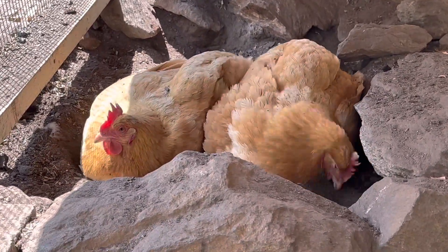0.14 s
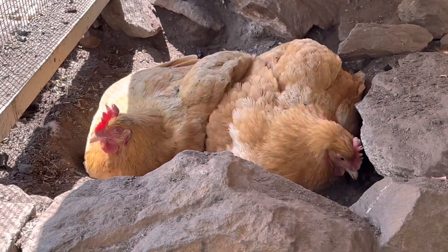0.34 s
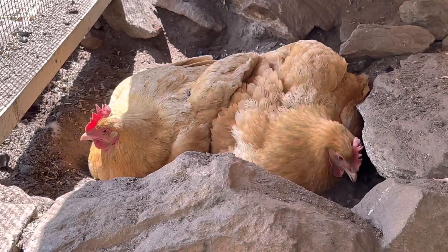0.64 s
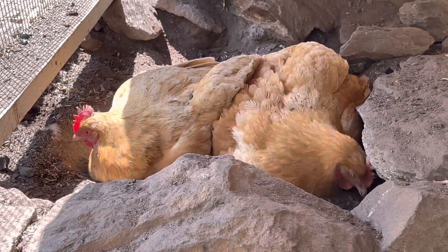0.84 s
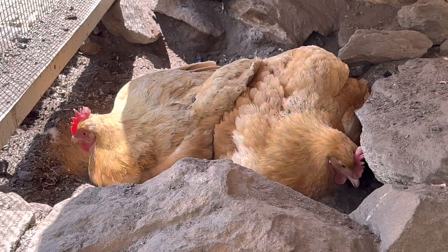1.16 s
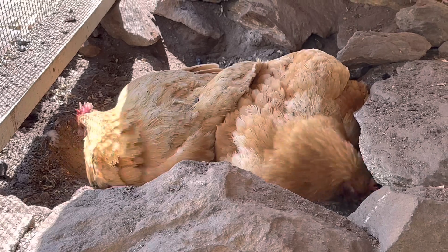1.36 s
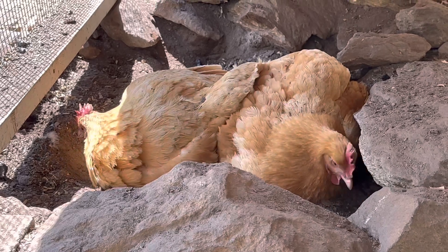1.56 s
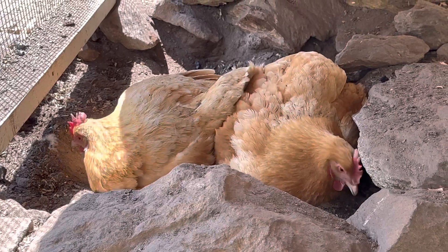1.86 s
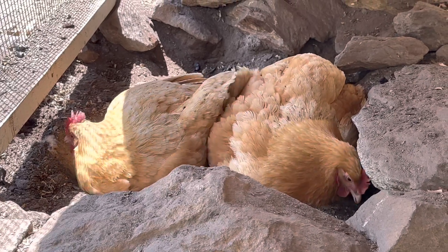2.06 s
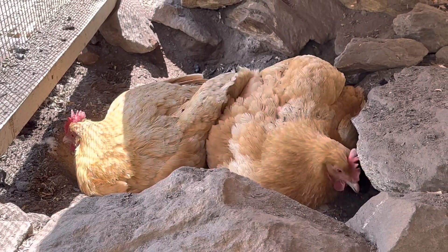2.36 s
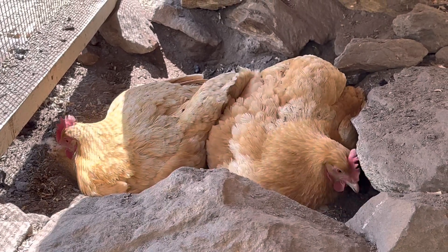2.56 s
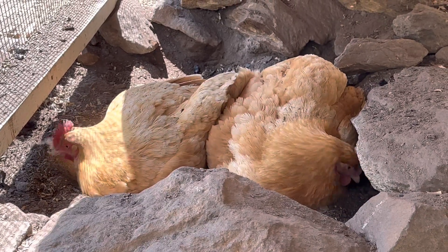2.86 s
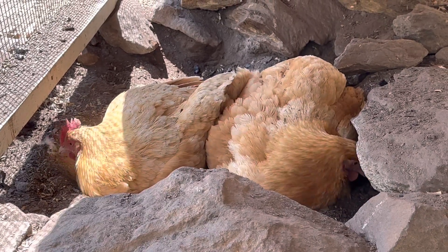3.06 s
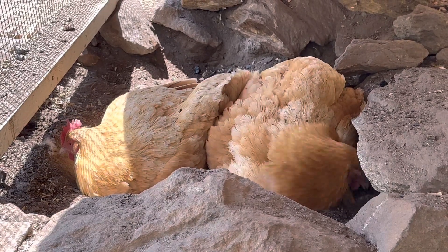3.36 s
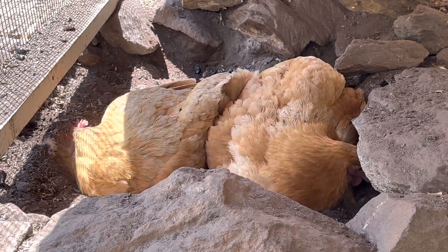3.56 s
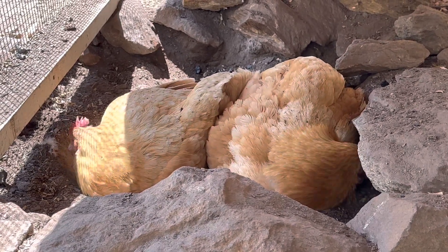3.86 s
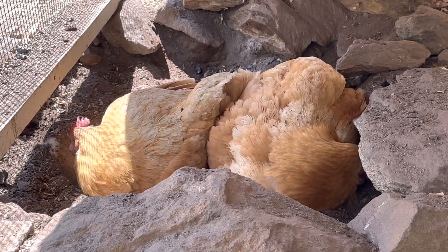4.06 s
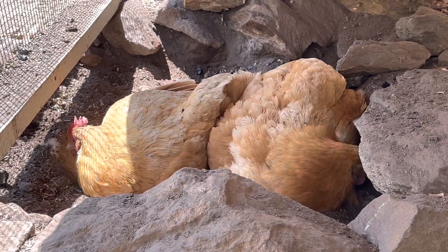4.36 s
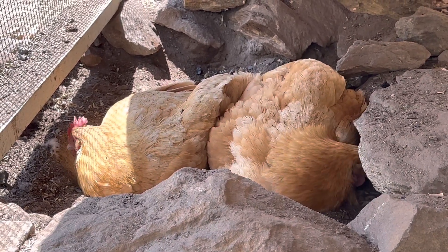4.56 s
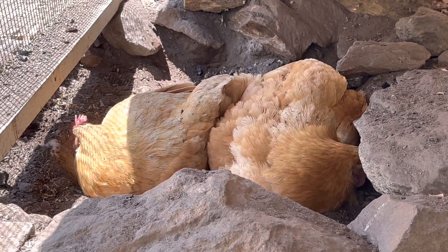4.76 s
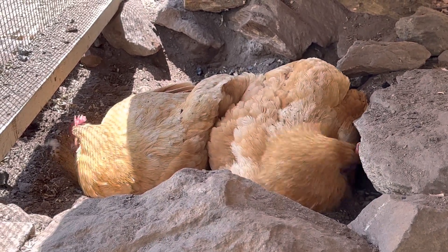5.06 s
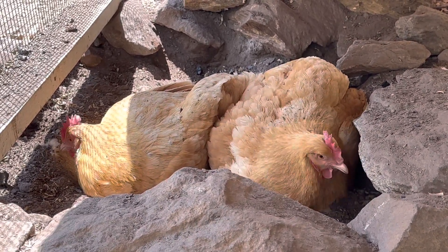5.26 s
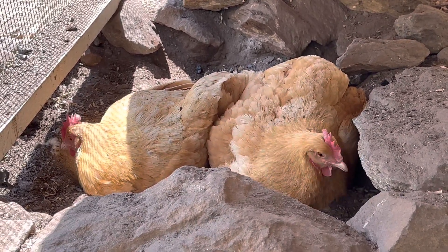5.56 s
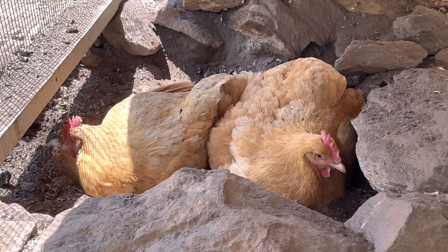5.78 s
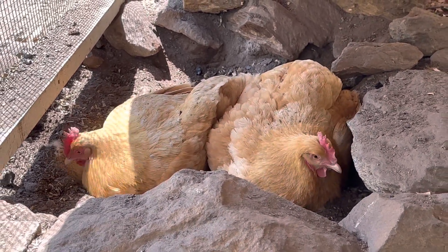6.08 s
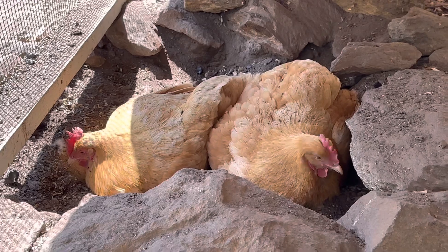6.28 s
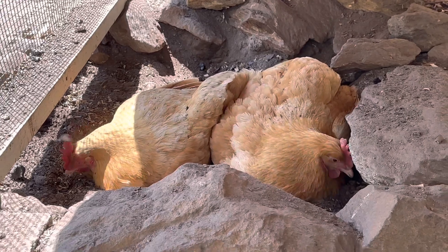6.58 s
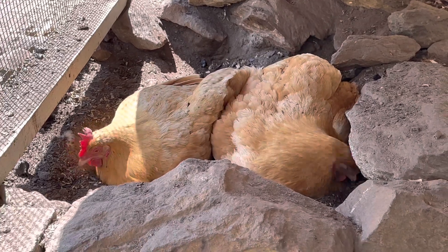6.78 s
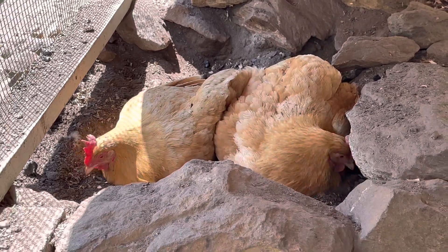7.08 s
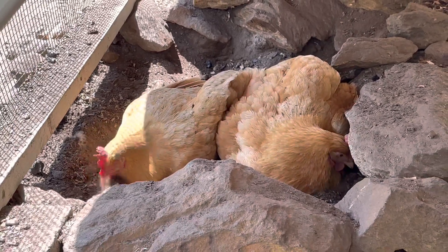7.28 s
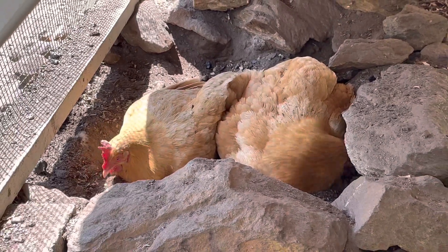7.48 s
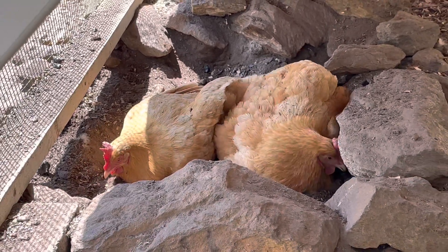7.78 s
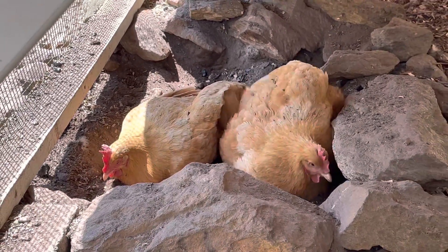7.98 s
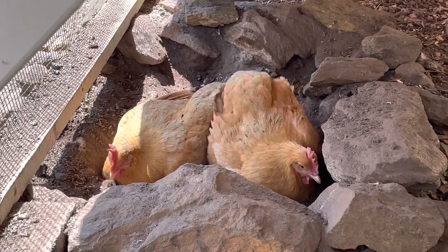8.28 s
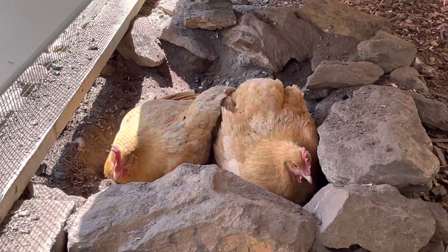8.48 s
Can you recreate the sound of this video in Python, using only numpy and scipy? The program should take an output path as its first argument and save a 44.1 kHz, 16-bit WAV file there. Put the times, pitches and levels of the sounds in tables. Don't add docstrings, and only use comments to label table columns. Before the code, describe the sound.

Hens scrape feathers and peck in dry soil among rocks while sparrows cheep nearby and a distant truck drones over a low town rumble.

```python
import sys
import numpy as np
from scipy import signal
from scipy.fft import rfft, irfft, next_fast_len
from scipy.io import wavfile
from scipy.ndimage import uniform_filter1d

SR = 44100
rng = np.random.default_rng(int(sys.argv[2]) if len(sys.argv) > 2 else 0)


def convert_level_to_amplitude(level_db):
    exponent = np.asarray(level_db, float) / 20
    return 10 ** exponent


def transcribe(signal):
    frames = np.atleast_2d(signal).T
    limited = np.clip(frames, -1, 1)
    pcm = np.round(limited * 32767).astype(np.int16)
    wavfile.write(sys.argv[1], SR, pcm)


N = 380583


def evened(x):
    return x / np.sqrt(np.mean(x ** 2) + 1e-20)


def read(points, hz):
    f, value = np.transpose(points)
    return np.interp(np.log(hz + 1), np.log(f + 1), value)


def add(mix, s, sound):
    part = mix[round(s * SR):][:len(sound)]
    part += sound[:len(part)]


def unfold(rows):
    s, *columns = np.transpose(rows)
    t = np.arange(s[0], s[-1], 1 / SR)
    return s[0], [np.interp(t, s, c) for c in columns]


def wander(count, smooth_s):
    size = int(smooth_s * SR) + 1
    noise = rng.standard_normal(count + 4 * size)
    drift = uniform_filter1d(uniform_filter1d(noise, size), size)
    return evened(drift)[:count]


def colour(x, points):
    hz = np.linspace(0, SR / 2, 513)
    taps = signal.firwin2(511, hz, convert_level_to_amplitude(read(points, hz)), fs=SR)
    return signal.oaconvolve(x, taps, "same")


def band(x, lo_hz, hi_hz):
    sos = signal.butter(2, [lo_hz, min(hi_hz, .45 * SR)], "bandpass", fs=SR, output="sos")
    return signal.sosfilt(sos, x)


def grains(per_s, spread_db):
    landed = rng.random(N) < per_s / SR
    size = convert_level_to_amplitude(spread_db * np.minimum(rng.exponential(1, N), 6)) * landed
    kind, noise = rng.integers(0, 6, N), rng.standard_normal(N)
    puffs = [signal.lfilter([1], [1, -.992], size * (kind == k)) * noise for k in range(6)]
    centres_hz = np.geomspace(1500, 14000, 6)
    tinted = sum(evened(band(p, hz, 1.6 * hz)) for p, hz in zip(puffs, centres_hz))
    return evened(evened(sum(puffs)) + 0.66 * evened(tinted))


# (frequency [Hz], level [dB])
FEATHER_COLOUR = [(300, 7), (1000, 2), (2500, 2.5), (4000, -2), (7000, -4), (8500, -3.5), (10500, -12.5),
                  (12000, -31)]
# (frequency [Hz], level [dB])
SAND_COLOUR = [(9500, -28), (11000, -5.5), (14000, 0.5), (15500, 1.5)]
# (time [s], length [s], level [dB], sand hiss relative to it [dB])
FEATHER_STROKES = [(0.053, 0.2, -83, -8), (0.764, .24, -91.5, -8), (1.334, .04, -78.5, -11),
                   (2.149, 0.03, -82, -9.5), (2.185, .03, -79.5, -10.5), (2.525, .42, -94.5, 8.5),
                   (2.53, .025, -96, 10), (2.64, .075, -87.5, 10), (2.757, .015, -93.5, 11),
                   (2.798, .035, -90.5, 9), (2.883, 0.037, -97, 8), (2.972, 0.23, -95.5, 7.5),
                   (3.472, .025, -95.5, 7.5), (3.602, 0.039, -94, 8), (3.702, 0.1, -93, 7.5),
                   (3.855, .09, -93.5, 7.5), (4.17, 0.098, -92, 5.5), (7.491, 0.013, -81, -5),
                   (8.073, .02, -86, -8), (3.277, .05, -81, -18), (3.449, 0.487, -88, -8),
                   (4.178, 0.02, -89.5, 3.5), (4.243, 0.015, -74, -9), (4.3, 0.014, -97, 2),
                   (7.618, 0.037, -87.5, -7), (5.532, 0.052, -77.5, -5), (5.747, 0.24, -85, -3.5),
                   (6.022, 0.027, -76, 1.5), (6.2, 0.82, -103, 0), (7.185, 0.04, -84, 2.5),
                   (7.47, 0.041, -82.5, 1.5), (7.81, 0.078, -79.5, -6.5), (8.28, .04, -65.5, -17.5),
                   (8.35, 0.033, -74, -7), (8.41, .035, -70.5, 0), (8.464, .04, -83, -18)]


def rustle():
    press_s, lift_s = 0.015, 0.036
    stir_db, stir_sand_db = -92.5, -2
    clump_db, clump_s = 3, 0.014
    t = np.arange(N) / SR
    drag = convert_level_to_amplitude(stir_db) * np.ones(N)
    hiss = convert_level_to_amplitude(stir_db + stir_sand_db) * np.ones(N)
    for s, length_s, db, sand_db in FEATHER_STROKES:
        corners_s = [s - press_s, s, s + length_s, s + length_s + lift_s]
        stroke = convert_level_to_amplitude(db) * np.interp(t, corners_s, [0, 1, 1, 0]) ** 2
        drag += stroke
        hiss += convert_level_to_amplitude(sand_db) * stroke
    drag *= convert_level_to_amplitude(clump_db * wander(N, clump_s))
    hiss *= convert_level_to_amplitude(clump_db * wander(N, clump_s))
    scrape = grains(1800., 2.0)
    feathers = convert_level_to_amplitude(2.5) * drag * evened(colour(scrape, FEATHER_COLOUR))
    sand = 0.46 * scrape + grains(900., 2.2)
    return feathers + convert_level_to_amplitude(1.5) * hiss * evened(colour(sand, SAND_COLOUR))


def peck(peak_db, thud_db, sand_db):
    t = np.arange(4000) / SR
    tail = .5 * convert_level_to_amplitude(-60 * t / 0.059 + 3.6 * wander(len(t), 0.0025))
    burst = rng.standard_normal(len(t)) * (convert_level_to_amplitude(-60 * t / 0.0017) + tail)
    thud = convert_level_to_amplitude(thud_db - 0.5) * evened(band(burst * np.minimum(t / 0.0091, 1), 200, 2650))
    tick = evened(colour(burst, FEATHER_COLOUR[2:]))
    sand = convert_level_to_amplitude(sand_db + 9.0) * evened(colour(burst, SAND_COLOUR))
    return convert_level_to_amplitude(peak_db - 22) * (thud + tick + sand)


def speck(peak_db, sand_db):
    t = np.arange(1500) / SR
    burst = rng.standard_normal(len(t)) * (convert_level_to_amplitude(-60 * t / 0.004) + convert_level_to_amplitude(-6.0 - 60 * t / 0.03))
    tick = evened(colour(burst, FEATHER_COLOUR[2:]))
    sand = convert_level_to_amplitude(sand_db + 2.0) * evened(colour(burst, SAND_COLOUR))
    return convert_level_to_amplitude(peak_db - 20.5) * (tick + sand)


def scuff(db, length_s, hz):
    count = int(length_s * SR)
    grit = rng.standard_normal(count) * convert_level_to_amplitude(1.0 * wander(count, 0.00077))
    return convert_level_to_amplitude(db) * evened(band(grit, 0.38 * hz, 1.1 * hz)) * signal.windows.tukey(count, .6)


# (time [s], peak level [dB], thud relative to it [dB], sand relative to it [dB])
PECKS = [(0.0696, -61, 10, -23), (0.1366, -67, 9, -1.5), (0.222, -55.5, -11, -7), (0.254, -58.5, -16, -12),
         (0.287, -55, -20, -26), (1.096, -66.5, -5, -5.5), (1.3649, -43.5, 0.5, -26.5),
         (2.6988, -58.5, -20, -6.5), (2.825, -60.5, -15, -12), (2.997, -56, -12, -7),
         (3.2014, -60, 3, -4.5), (3.2789, -51, -10, -19), (3.3107, -39.5, -3, -19), (3.711, -59.5, -1, -15),
         (3.8506, -49, -9, -12), (4.1727, -63, -9, -6), (4.293, -53, -0.5, -16), (5.1804, -59.5, 12, -18),
         (5.527, -68.5, -2, 1.5), (5.7723, -64, -9, -41), (6.0265, -50.5, -13, -13), (6.48, -60.5, -9, -13),
         (7.464, -65, 12, -9.5), (7.766, -55.5, -20, -22), (7.916, -58, -4, -18), (8.128, -56.5, -18, -12),
         (8.284, -51.5, -30, -27), (8.3745, -55.5, -13, -17)]
# (time [s], peak level [dB], sand relative to it [dB])
GRIT_SPECKS = [(0.169, -61.5, -16), (.41, -66, -2), (.595, -63.5, -15), (2.5414, -74, 11),
               (2.6566, -67.5, 4.5), (2.8816, -63, 14.5), (2.5925, -75.5, 8), (2.6329, -74, 8.5),
               (3.0614, -79, 8), (3.0939, -78, 7), (3.1423, -77, 9), (3.6257, -74, 7), (3.7673, -74, 8),
               (3.918, -77.5, 7.5), (7.255, -70, -9), (7.5, -62, -9), (3.421, -63, -17), (4.2294, -70, -2),
               (4.2462, -66.5, -12), (4.5873, -63, -16), (5.435, -71, 11), (5.7379, -64, -17),
               (5.9329, -62.5, -7), (6.6884, -67, -18), (7.1955, -63, -9), (7.2937, -72, 19),
               (8.4043, -58.5, 0), (8.4746, -58, -16), (8.578, -63, -4)]
# (time [s], level [dB], length [s], centre frequency [Hz])
SCUFFS = [
    (0.464, -79, 0.07, 4600),
    (0.859, -72.5, 0.14, 3230),
    (2.141, -64, 0.053, 2200),
    (6.455, -80, 0.094, 4390),
    (6.683, -62, 0.04, 1220),
    (6.843, -75.5, 0.063, 3800),
    (7.163, -66, 0.096, 2900),
    (8.277, -62, 0.064, 1505),
]


def foraging():
    hens = rustle()
    for s, *row in PECKS:
        add(hens, s + .001, peck(*row))
    for s, *row in GRIT_SPECKS:
        add(hens, s, speck(*row))
    for s, *row in SCUFFS:
        add(hens, s, scuff(*row))
    return hens


# (time [s], effort level [dB], pitch [Hz])
CLUCK = [
    (1.728, -49, 280),
    (1.738, -35, 286),
    (1.758, -34, 290),
    (1.767, -40, 280),
    (1.779, -56, 270),
]
# (multiple of the pitch, level [dB])
CLUCK_TONES = [(.95, 0), (1.45, -17), (2.05, -11), (2.4, -15), (3, -5), (3.4, -13), (4, -21), (4.5, -21)]
# (low edge [Hz], high edge [Hz], level [dB])
THROAT_BREATH = [(480, 1100, -14), (1050, 2300, -29), (4500, 9000, -54)]
# (low edge [Hz], high edge [Hz], ring [Hz], level [dB], start time [s])
CREAK = (2900, 4300, 3950, -39, 1.738)


def cluck():
    s, (effort_db, hz) = unfold(CLUCK)
    count = len(hz)
    turn = 2 * np.pi * np.cumsum(hz * (1 + .025 * wander(count, .003))) / SR
    tones = sum(convert_level_to_amplitude(db + 2.0 * wander(count, .003)) * np.sin(k * turn) for k, db in CLUCK_TONES)
    puffs = rng.standard_normal(count) * (1 + np.cos(turn))
    voice = evened(tones)
    for lo, hi, db in THROAT_BREATH:
        voice += convert_level_to_amplitude(db) * evened(band(band(puffs, lo, hi), lo, hi))
    lo_hz, hi_hz, ring_hz, creak_db, start_s = CREAK
    t = s + np.arange(count) / SR
    strong = (1 + np.cos(.44 * turn - .9)) ** 2 * np.clip((t - start_s) / .012, 0, 1)
    creak = evened(band(puffs, lo_hz, hi_hz)) + 2 * np.sin(2 * np.pi * ring_hz * t)
    voice = evened(voice) + convert_level_to_amplitude(creak_db) * evened(strong * creak)
    call = convert_level_to_amplitude(effort_db) * voice * signal.windows.tukey(count, .15)
    call = np.pad(call, (0, SR // 10))
    slap_s, slap_db, slap_hz = .041, -19, 600
    return s, call + convert_level_to_amplitude(slap_db) * band(np.roll(call, int(slap_s * SR)), 150, slap_hz)


def ring(modes):
    t = np.arange(6000) / SR
    tones = sum(convert_level_to_amplitude(db - 60 * t / t60) * np.sin(2 * np.pi * hz * t) for hz, db, t60 in modes)
    return tones * np.minimum(t / 0.0013, 1)


# (frequency [Hz], level [dB], time to fall 60 dB [s])
WIRE_TONES = [(700, -5, .06), (1500, -12, .05), (1916, -2, .12), (1870, -15, .08), (2330, -14, .06),
              (6519, -22, .15)]
# (time [s], level [dB])
WIRE_TAPS = [
    (8.284, -43.5),
    (8.341, -50.5),
]
# (time [s], level [dB], frequency [Hz])
PEBBLE_KNOCKS = [
    (1.368, -43, 270),
    (3.312, -45, 200),
    (2.146, -55, 720),
    (2.148, -60, 1650),
]
# (time [s], level [dB], frequency [Hz])
STONE_PINGS = [
    (8.3726, -62, 5840),
    (8.4045, -61, 8200),
    (8.414, -55, 8400),
    (8.4749, -63, 4580),
    (8.477, -65, 6900),
    (8.5766, -72, 6700),
    (8.44, -62, 1620),
    (1.398, -70, 5550),
    (6.69, -70, 3900),
    (8.077, -72, 4600),
]


def taps():
    struck = np.zeros(N)
    for s, db in WIRE_TAPS:
        add(struck, s, convert_level_to_amplitude(db) * ring(WIRE_TONES))
    for s, db, hz in PEBBLE_KNOCKS:
        add(struck, s, convert_level_to_amplitude(db) * ring([(hz, 0, .05), (2.2 * hz, -3, .04)]))
    for s, db, hz in STONE_PINGS:
        add(struck, s, convert_level_to_amplitude(db) * ring([(hz, -2, .022), (1.04 * hz, -7, .015)]))
    return struck


# (time [s], strength of scattered strands, roughness factor)
HEDGE = [
    (5.1, .22, 1.0),
    (5.6, .48, 1.5),
    (8.2, .48, 1.5),
    (8.24, .15, .6),
]


def cheep(s, length_s, top_hz, end_hz, db, shape):
    crest, bend, rise, loudest = shape
    at, strengths, factors = np.transpose(HEDGE)
    scatter, rough = np.interp(s, at, strengths), np.interp(s, at, factors)
    u = np.linspace(0, 1, int(length_s * SR))
    from_crest = abs(u - crest) / (1 - crest) * np.where(u < crest, rise, 1)
    hz = top_hz - (top_hz - end_hz) * from_crest ** bend
    level_db = db + np.interp(u, [0, loudest, 1], [-6, 0, -1.5])
    turn = 2 * np.pi * np.cumsum(hz * (1 + .014 * rough * wander(len(hz), .003))) / SR
    burr = convert_level_to_amplitude(3.5 * rough ** .5 * wander(len(hz), .005))
    whistle = np.sin(turn) + convert_level_to_amplitude(-29) * np.sin(2 * turn)
    tone = whistle * convert_level_to_amplitude(level_db) * evened(burr) * signal.windows.tukey(len(hz), .2)
    strands = np.zeros(SR // 45)
    strands[rng.integers(SR // 300, SR // 45, 6)] = scatter * rng.uniform(-1, 1, 6)
    strands[0] = 1
    return s - .003, signal.fftconvolve(tone, strands / np.linalg.norm(strands))


# (time [s], length [s], top pitch [Hz], end pitch [Hz], level [dB])
ARCHES = [
    (0.019, 0.08, 3105, 2690, -59.5),
    (0.257, 0.091, 3290, 2690, -59),
    (2.021, 0.083, 2760, 2100, -59),
    (3.71, 0.082, 3440, 2240, -63),
    (4.608, .05, 4200, 3220, -60),
    (5.762, 0.048, 3600, 3300, -71),
    (6.49, 0.05, 3330, 2900, -75),
]
HOLDS = [
    (.612, .064, 2480, 1830, -56),
    (3.498, .06, 3080, 2620, -59),
    (4.625, .072, 2855, 2120, -63),
    (4.943, .075, 2760, 2280, -62),
    (7.525, .075, 3260, 2850, -66),
    (6.09, .075, 3305, 2650, -64),
    (6.7, .042, 4020, 3550, -68),
]
DIVES = [
    (5.785, .053, 2970, 2240, -63),
    (6.288, .025, 4200, 3100, -75),
    (6.635, .025, 2600, 2440, -67),
    (8.291, .04, 3150, 2740, -59),
    (7.19, .04, 2180, 1880, -65),
]
SLIDES = [(.772, .088, 2900, 1990, -59), (2.19, .075, 3120, 2120, -59.5), (2.36, .085, 3130, 2150, -59.5),
          (3.138, .04, 4120, 3300, -69), (4.768, .08, 3170, 2050, -62.5), (5.632, .06, 2810, 2520, -69),
          (5.928, .062, 3260, 2720, -61), (6.985, .05, 3500, 2700, -71), (.855, .035, 3900, 2850, -74),
          (7.18, .034, 3650, 3330, -70), (8.124, .045, 3550, 3330, -72), (6.607, .055, 3360, 2200, -64.5),
          (7.918, .032, 3440, 3390, -68), (7.348, .05, 3120, 2450, -64), (4.77, .04, 3480, 3200, -72)]
SCRAPS = [(1.285, .026, 3520, 2780, -71), (1.4, .05, 3430, 3330, -75), (1.416, .022, 3250, 2780, -71),
          (1.47, .02, 2170, 2090, -72), (1.575, .028, 3620, 2880, -72), (1.774, .036, 2830, 2720, -67),
          (6.668, .026, 2560, 2480, -68), (6.724, .04, 3520, 2780, -66), (6.75, .032, 3520, 3080, -70),
          (7.378, .035, 2560, 2400, -66), (7.968, .018, 4320, 4080, -78), (7.986, .04, 3800, 2750, -72),
          (8.003, .026, 2920, 2680, -70), (8.106, .018, 2880, 3060, -72), (8.138, .075, 3080, 2180, -66),
          (8.332, .036, 2720, 2500, -64), (8.25, .03, 3440, 3370, -69), (8.31, .03, 3000, 3080, -70),
          (3.555, .03, 2600, 2060, -70), (3.555, .03, 2780, 2740, -70), (4.958, .022, 3750, 2900, -75),
          (5.5, .024, 4020, 3880, -73), (5.515, .02, 3600, 3050, -77), (5.664, .03, 3620, 3300, -71),
          (5.667, .02, 4250, 3800, -77), (5.824, .022, 4250, 4150, -75), (6.292, .02, 3250, 3150, -71),
          (6.296, .02, 3800, 3450, -73), (3.815, .03, 2800, 2700, -74), (.065, .05, 2080, 1900, -70),
          (3.165, .025, 3500, 2600, -73), (7.945, .045, 3320, 2780, -74), (8.15, .035, 3050, 2900, -70)]
# (time [s], top pitch [Hz], end pitch [Hz], level [dB])
CHIPS = [
    (1.612, 2780, 2580, -71),
    (3.025, 4000, 2700, -76),
    (7.995, 2530, 2330, -67),
    (6.522, 3000, 2150, -71),
    (8.455, 3500, 2480, -76),
    (3.725, 3720, 3600, -75),
    (6.9, 3460, 2500, -75),
    (7.06, 3600, 3110, -75),
    (7.785, 3450, 2950, -74),
    (6.985, 4100, 3850, -79),
]
ARCH_SHAPE = (0.33, 1.7, 2.5, 0.87)
HOLD_SHAPE = (.2, 2.0, 1.2, 0.48)
DIVE_SHAPE = (.04, .62, .5, .55)
SLIDE_SHAPE = (.08, 0.95, 2.3, 0.46)


def sparrows():
    birds = np.zeros(N)
    kinds = [(ARCHES, ARCH_SHAPE), (HOLDS, HOLD_SHAPE), (DIVES, DIVE_SHAPE),
             (SLIDES, SLIDE_SHAPE), (SCRAPS, SLIDE_SHAPE)]
    for rows, shape in kinds:
        for row in rows:
            add(birds, *cheep(*row, shape))
    for s, *row in CHIPS:
        add(birds, *cheep(s, 0.048, *row, SLIDE_SHAPE))
    return birds


def yard(x, t60_s):
    t = np.arange(SR // 3) / SR
    tail = rng.standard_normal((2, len(t))) * convert_level_to_amplitude(-60 * t / t60_s) * (t > .006)
    return signal.fftconvolve(x[None], tail / np.linalg.norm(tail[0]), axes=1)[:, :N]


def truck(rows):
    s, (hz, level_db) = unfold(rows)
    count = len(hz)
    octave_db = level_db - 16 - 0.4484 * abs(2 * hz - 155.2)
    shift_s, strain_s, strain_db = 5.12, 1.32, 10.5
    since_s = s + np.arange(count) / SR - shift_s
    octave_db += strain_db * np.clip(1 - since_s / strain_s, 0, 1) * (since_s > -.1)
    uneven_db, uneven_s = 3.5, 0.11
    above_db = -66.5 + uneven_db * wander(count, uneven_s)
    below_db = -62.5 + uneven_db * wander(count, uneven_s)
    turn = 2 * np.pi * np.cumsum(hz) / SR
    tone = convert_level_to_amplitude(level_db + 0.45 * wander(count, 0.024)) * np.sin(turn)
    tone += convert_level_to_amplitude(octave_db) * (np.sin(2 * turn) + convert_level_to_amplitude(-13.5) * np.sin(3 * turn))
    tone += convert_level_to_amplitude(above_db) * np.sin(1.2 * turn)
    tone += convert_level_to_amplitude(below_db + 2.3 * wander(count, 0.057)) * np.sin(.78 * turn)
    return s, np.sqrt(2) * tone * signal.windows.tukey(count, .03)


def idler():
    t = np.arange(N) / SR
    swell = convert_level_to_amplitude(-51.5 + 2.1 * wander(N, 0.058)) * np.exp(-((t - 1.85) / 0.39) ** 2)
    return swell * np.sin(2 * np.pi * 105.2 * t)


# (time [s], firing rate [Hz], level [dB])
TRUCK_GEARS = [
    [(0.0, 85, -56), (1.2, 86.5, -53.5), (2.4, 87.07, -47.5), (3.1, 88.53, -47.5), (3.6, 90.4, -41.5),
     (4, 92.7, -44.5), (4.3, 92.4, -44.5), (4.47, 91.4, -54.5)],
    [(5.12, 77.8, -63), (5.3, 78.26, -48), (5.6, 77, -45), (5.95, 78.46, -43), (6.3, 78.73, -45),
     (7.1, 81.7, -50), (8, 83.05, -52), (8.62, 85.6, -48.5)],
]


def engines():
    far = idler()
    for rows in TRUCK_GEARS:
        add(far, *truck(rows))
    return far


# (frequency [Hz], level [dB per Hz])
TOWN_COLOUR = [(27, -52), (38, -26), (48, 1), (93, 0), (243, -16.5), (400, -21.5), (676, -26.5),
               (1550, -29), (2100, -32.5), (2690, -40.5), (3650, -55), (8580, -58.5), (14300, -59),
               (15000, -71)]
# (time [s], level [dB])
TOWN_LEVEL = [(0, -54.5), (2.3, -54), (4.8, -54), (7, -52.5), (8.63, -52.5)]
# (frequency [Hz], side level [dB])
WIDTH = [(100, -16.5), (200, -7.5), (700, 0), (1300, 1.5), (1850, 1), (2150, -13), (4000, -9.5),
         (6600, -17.5), (7100, 3.5), (8000, -6.5), (8900, -19.5), (10000, 5), (13300, -4), (14200, -23)]
# (frequency [Hz], likeness from -1 to 1)
LEAN = [(100, -0.05), (500, 0.1), (1300, -0.46), (2300, -0.3)]


def town():
    frames, hz = N // 512 + 5, np.fft.rfftfreq(2048, 1 / SR)
    a, b, c, d, patches = rng.standard_normal((frames, 1025, 5)).T
    patches = evened(uniform_filter1d(uniform_filter1d(patches, 20, 0), 8, 1))
    lean = np.clip(read(LEAN, hz), -1, 1)[:, None]
    mid, other = a + 1j * b, c + 1j * d
    side = convert_level_to_amplitude(read(WIDTH, hz))[:, None] * (lean * mid + np.sqrt(1 - lean ** 2) * other)
    z = np.array([mid, side]) * convert_level_to_amplitude(read(TOWN_COLOUR, hz)[:, None] + 1.12 * patches)
    wash = signal.istft(z, nperseg=2048, noverlap=1536)[1][:, :N]
    level_db = np.interp(np.arange(N) / SR, *np.transpose(TOWN_LEVEL))
    return convert_level_to_amplitude(level_db) * wash / wash[0].std()


def scene():
    near = foraging() + taps()
    add(near, *cluck())
    birds, far = sparrows(), engines()
    late = signal.hilbert(near + convert_level_to_amplitude(3) * birds, next_fast_len(N))[:N].imag
    side = colour(late, [(300, -20.0), (900, -7.0), (1400, -0.5)] + WIDTH[5:]) + convert_level_to_amplitude(-23.5) * far
    wet = convert_level_to_amplitude(-14) * yard(near, .11) * [[1], [.3]]
    wet += convert_level_to_amplitude(-9.5) * yard(birds, .13) * [[1], [.4]]
    return np.array([near + birds + far, side]) + wet + town()


# (frequency [Hz], width [Hz], depth [dB])
PORT_NULLS = [(7530, 280, 12), (11320, 1130, 13.5)]


def ports(dry):
    hz = np.fft.rfftfreq(N, 1 / SR)
    dips_db = sum(db * np.exp(-((hz - f) / width) ** 2) for f, width, db in PORT_NULLS)
    mid, side = irfft(rfft(dry) * convert_level_to_amplitude([-dips_db, 0 * hz]) * (hz < 15950), N)
    return np.array([mid + side, mid - side])


def low_pass(x):
    return signal.sosfilt(signal.butter(12, 16450, fs=SR, output="sos"), x)


def record(dry):
    mix = ports(dry)
    return low_pass(mix)


dry = scene()
out = record(dry)
transcribe(out)
```